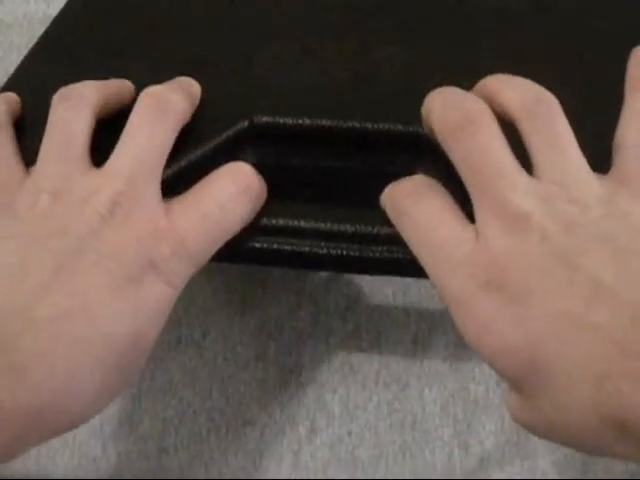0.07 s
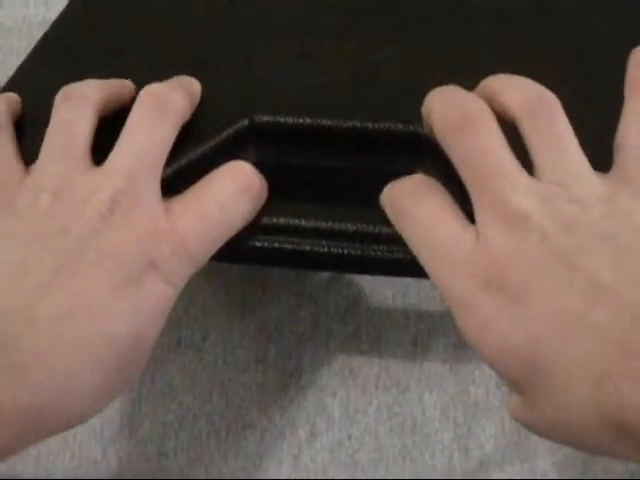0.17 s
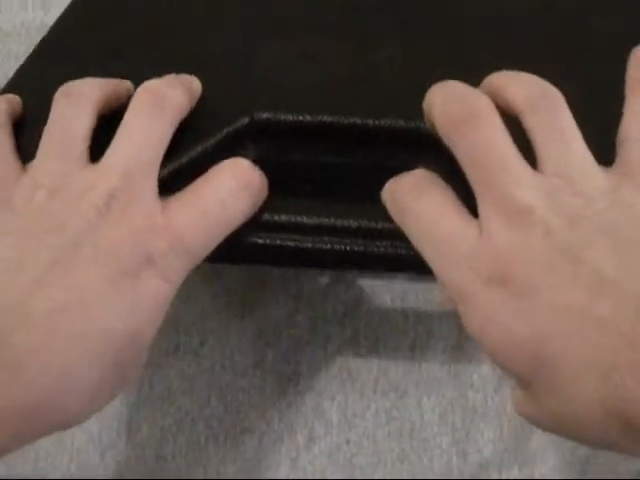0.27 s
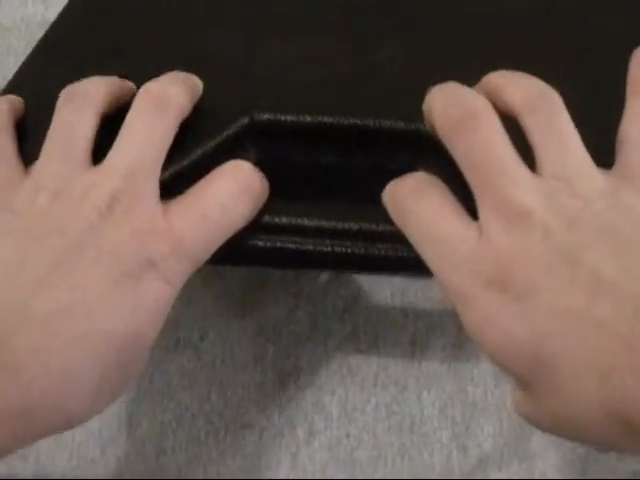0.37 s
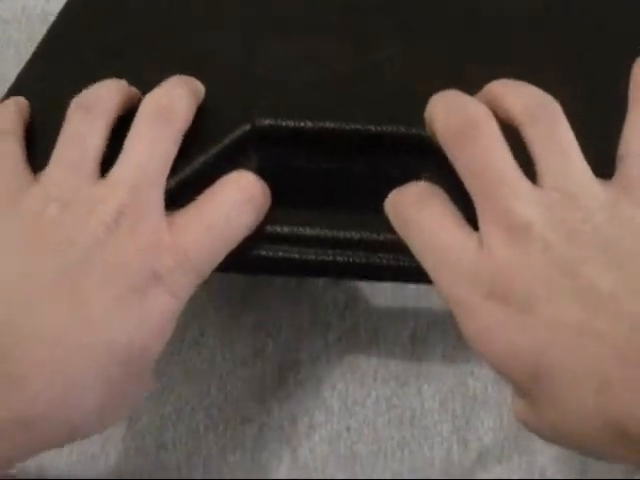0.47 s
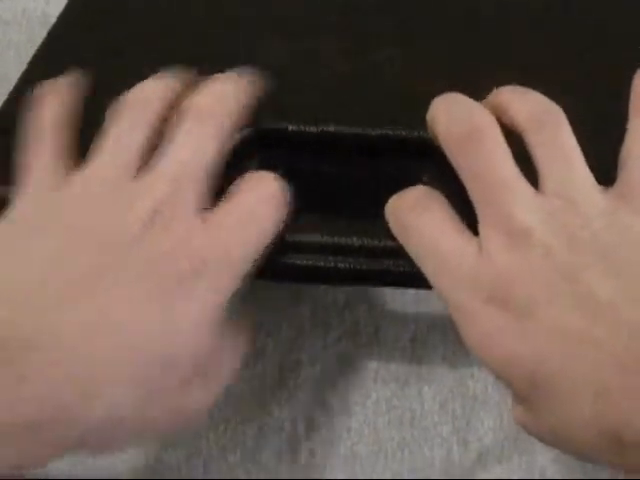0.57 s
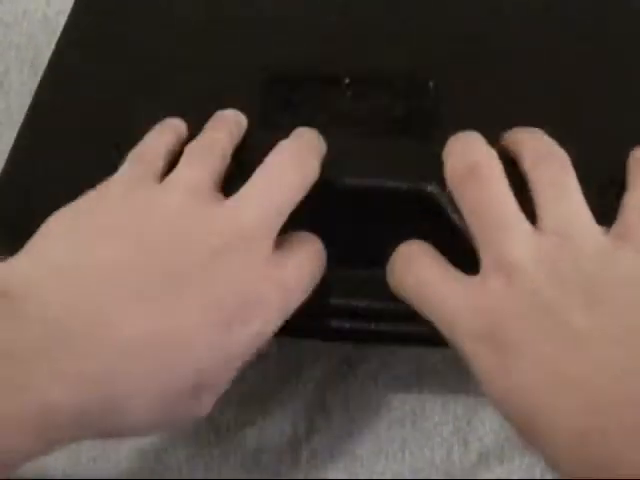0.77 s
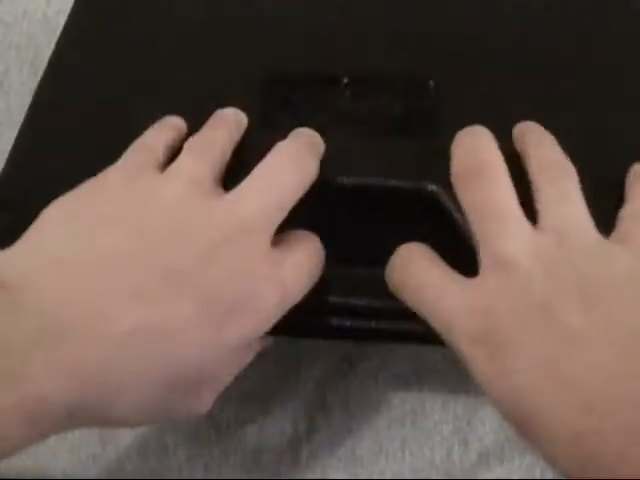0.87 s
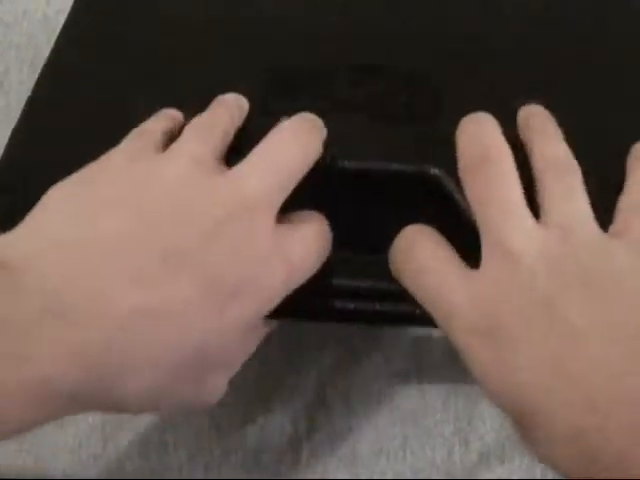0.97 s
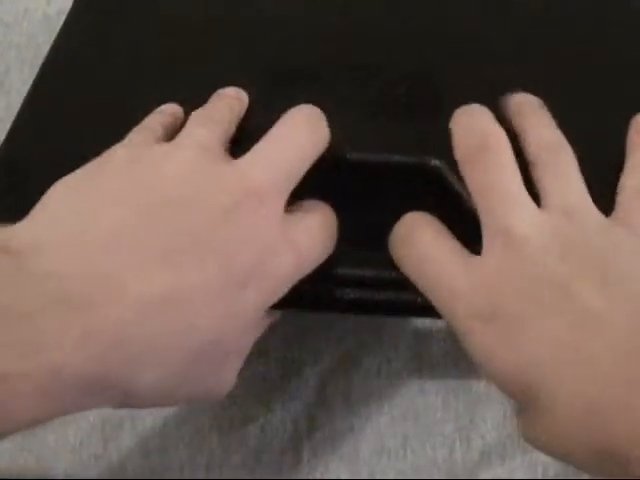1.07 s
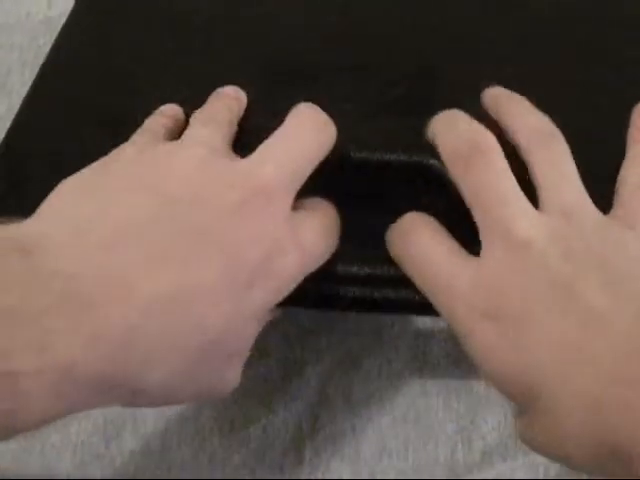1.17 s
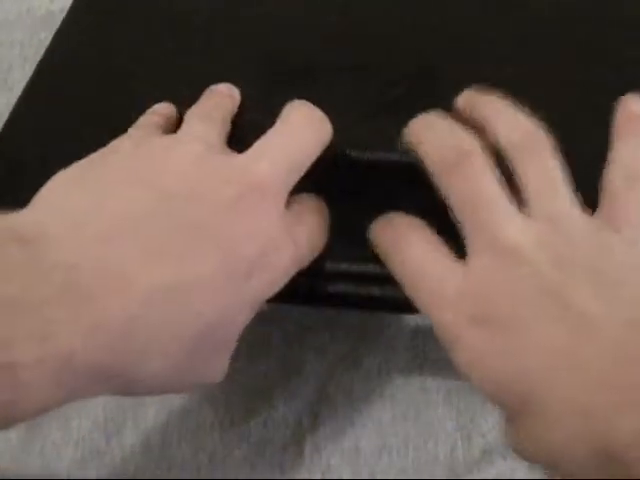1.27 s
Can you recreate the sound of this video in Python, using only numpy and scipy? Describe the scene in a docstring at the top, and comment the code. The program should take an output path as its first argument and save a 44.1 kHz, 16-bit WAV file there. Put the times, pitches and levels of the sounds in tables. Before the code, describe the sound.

Two latches of a hard plastic case snap open, one loud, one softer, then handling clicks

```python
"""In a small room, close to the microphone, two latches of a hard plastic case snap open in turn.
Each snap is a gritty crack with swings of the hollow wall, ringing lever and shell, and a thin high ringing
around 8 kHz. Around them fingers shift on the lid: noisy ticks with short pings, damped low bumps, and
rubbing built from dense random grains. Decaying noise makes the reflections; coloured noise a steady hiss."""
import sys
import numpy as np
from scipy import signal
from scipy.io import wavfile

SR = 44100
rng = np.random.default_rng(int(sys.argv[2]) if len(sys.argv) > 2 else 0)


def digitize_waveform(pressure):
    """Quantize a signal to 16-bit integers and store it at the path in sys.argv[1].

    Rows of a 2-D input are taken as channels; values are limited to [-1, 1].
    """
    field = np.atleast_2d(pressure).T
    bounded = np.clip(field, -1, 1)
    quanta = np.round(bounded * 32767).astype(np.int16)
    wavfile.write(sys.argv[1], SR, quanta)


N = 57330  # length in samples, 1.3 s

# Modes of the hollow plastic shell. Each row: pitch in Hz, level in dB, t60 in seconds.
SHELL_MODES = [(126.4, -28, 0.6), (225.8, -8, 0.37), (249, -31, 0.21), (340, -3, 0.27), (428.3, -17.5, 0.5),
               (479, -19, 0.18), (609.8, -20, 0.44), (717, -28, 0.08), (999, -17.5, 0.29),
               (1466, -26, 0.44), (1778, -33, 0.19)]
# Quickly damped modes of the latch lever. Each row: pitch in Hz, level in dB, t60 in seconds.
LEVER_MODES = [(448, 3.5, 0.0078), (625, -15, 0.012), (1027, -3, 0.011), (1194, -2, 0.012),
               (1460, -7, 0.012), (1715, -8, 0.01), (2330, -40, 0.0079)]


def amp(db):
    """Decibels to gain."""
    return 10 ** (np.asarray(db) / 20)


def evened(x):
    """Scales to unit rms."""
    return x / np.sqrt(np.mean(x ** 2) + 1e-20)


def read(points, hz):
    """Reads a table of (Hz, value) on a log-frequency axis."""
    f, value = np.transpose(points)
    return np.interp(np.log(hz + 1), np.log(f + 1), value)


def add(mix, s, sound):
    """Mixes a sound in at s seconds."""
    part = mix[max(round(s * SR), 0):][:len(sound)]
    part += sound[:len(part)]


def colour(x, points, size=4096):
    """Causal filter of unit energy with the spectrum given in (Hz, dB)."""
    hz = abs(np.fft.fftfreq(size, 1 / SR))
    log_gain = np.log(amp(read(points, hz)))
    # the Hilbert transform gives the minimum phase: energy arrives as early as it can
    spectrum = np.exp(np.conj(signal.hilbert(log_gain)))
    taps = np.fft.ifft(spectrum).real[:size // 2]
    return signal.fftconvolve(x, taps / np.linalg.norm(taps))[:len(x)]


def hiss():
    """Steady room and microphone noise: random samples through a fixed colour."""
    # Each row: frequency in Hz, relative density in dB per Hz.
    hiss_colour = [(20, 12.5), (45, -6.5), (150, -3), (260, 1.5), (500, 2.5), (1100, -5), (2000, -3),
                   (4000, -8.5), (6500, -14.5), (7900, -21.5), (10500, -16.5), (15000, -20.5)]
    level_db = -48  # rms
    return amp(level_db) * evened(colour(rng.standard_normal(N), hiss_colour))


def rubbing():
    """Sliding skin catches on the textured plastic in dense tiny grains of random size and sign."""
    # Strength of the fingers' sliding. Each row: time in seconds, level in dB.
    slides = [(0, -47.5), (0.098, -51.5), (.16, -58), (.22, -49.5), (.4, -41.5), (.5, -46), (0.523, -91),
              (.69, -48.5), (.78, -46.5), (.87, -49), (.915, -43.5), (.945, -45.5), (.98, -39),
              (1.011, -41.5), (1.035, -50.5), (1.12, -50), (1.165, -45.5), (1.21, -51), (1.3, -54.5)]
    # Colour of skin on plastic. Each row: frequency in Hz, relative level in dB.
    rub_colour = [(60, -12), (160, -11.5), (280, 13.5), (600, 2), (1100, 9), (1800, -3), (2500, -2.5),
                  (4000, -13.5), (6300, -8.5), (8000, -11.5), (10000, -14.5), (15000, -19)]
    grains_per_s, spread_db = 3000, 2
    size_db = spread_db * np.minimum(rng.exponential(1, N), 4)
    sizes = amp(size_db) * rng.choice([-1, 1], N)
    grains = sizes * (rng.random(N) < grains_per_s / SR)
    level_db = np.interp(np.arange(N) / SR, *np.transpose(slides))
    return evened(colour(grains, rub_colour)) * amp(level_db)


def contact(points, decay_s):
    """One sharp pulse with a short gritty trail, as hard surfaces meet."""
    grit, grit_hz, rise_s = 0.74, 1330, 0.00043  # trail's share of the energy, its low cut, its rise
    t = np.arange(SR // 20) / SR
    trail = rng.standard_normal(len(t)) * np.exp(-t / decay_s) * np.minimum(t / rise_s, 1)
    trail = signal.sosfilt(signal.butter(2, grit_hz, "high", fs=SR, output="sos"), trail)
    push = np.sqrt(grit) * trail / np.linalg.norm(trail)
    push[0] += np.sqrt(1 - grit)
    return colour(push, points)


def ring(modes):
    """Dying sines, from rows of pitch in Hz, level in dB, t60 in seconds."""
    t = np.arange(SR // 2) / SR
    out = np.zeros(len(t))
    for hz, db, t60 in modes:
        decay = np.exp(-np.log(1000) * t / t60)
        out += amp(db) * decay * np.sin(2 * np.pi * hz * t)
    return out


def flex(hz, swell_s, steep):
    """A heavily damped swing of the plastic wall, strongest swell_s after its start."""
    t = np.arange(SR // 8) / SR
    swell = (t / swell_s * np.exp(1 - t / swell_s)) ** steep
    return swell * np.sin(2 * np.pi * hz * t)


def lever_and_shell(lever_db, shell_db):
    """The lever's short clack and the shell's longer ring start together in opposite polarity."""
    return amp(lever_db) * ring(LEVER_MODES) - amp(shell_db) * ring(SHELL_MODES)


def handling():
    """Loose latches tick, each spot with a short ping of its own, and hands bump the hollow lid."""
    # Small plastic ticks. Each row: start in seconds, tick level in dB, lever clack in dB,
    # shell ring in dB, ping pitch in Hz, ping level in dB.
    ticks = [(0.0720, -25.5, -76, -56, 2460, -50), (0.4197, -16.5, -34, -60, 1500, -46),
             (0.726, -12.5, -30, -38, 2100, -36), (0.7288, -16.5, -35.5, -35, 2000, -23.5),
             (0.7305, -25, -33, -38.5, 1100, -26), (0.7550, -29, -39, -44, 1300, -48),
             (0.7732, -17.5, -37, -52, 1680, -37), (0.7820, -16, -51, -38.5, 1260, -51),
             (0.7915, -20, -43, -54, 3300, -29.5), (0.7981, -9.5, -31, -36, 2420, -27),
             (0.7998, -15.5, -37, -50, 870, -25), (0.8302, -18.5, -39, -37.5, 2300, -45),
             (0.8893, -9, -30, -34, 1510, -23), (0.8978, -12, -29.5, -49, 2020, -24),
             (0.952, -17, -36.5, -45, 1930, -32), (0.97, -18, -35, -52, 3720, -36.5),
             (0.973, -20, -37.5, -42, 1180, -27.5), (0.985, -18, -54, -49, 1060, -51),
             (1.0090, -19.5, -55, -48, 1080, -45), (1.1580, -28, -43, -39.5, 1220, -35)]
    # Soft bumps and rebounds of the lid. Each row: start in seconds, level in dB, pitch in Hz,
    # swell time in seconds.
    bumps = [(0.2890, -27.5, 760, 0.0077), (0.299, -25, 483, 0.0083), (0.3300, -24, 413, 0.0085),
             (0.3420, -24, 244, 0.0079), (0.4271, -22, 267.4, 0.0085), (0.4340, -29, 840, 0.0049),
             (0.4370, -30, 557, 0.0042), (0.7280, -32.5, 342, 0.006), (0.8000, -30, 271, 0.0055),
             (0.8380, -32.5, 280, 0.011), (0.8838, -18, 280, 0.0021), (0.8862, -37, 147, 0.012),
             (0.9720, -34.5, 260, 0.006), (1.0920, -43.5, 345, 0.0094), (1.1050, -32, 269, 0.011),
             (1.141, -36, 378, .005), (1.154, -30, 268, .009)]
    # Colour of a tick. Each row: frequency in Hz, relative level in dB.
    tick_colour = [(40, -52), (150, -48), (600, -3.5), (1500, 7.5), (2200, 9.5), (3100, -1.5), (4200, 1),
                   (6300, -0.5), (7900, -5.5), (9800, -5), (15000, -10)]
    tick_decay_s, ping_t60_s = 0.0023, 0.0096
    out = np.zeros(N)
    for s, tick_db, lever_db, shell_db, ping_hz, ping_db in ticks:
        add(out, s, amp(tick_db) * contact(tick_colour, tick_decay_s))
        add(out, s, lever_and_shell(lever_db, shell_db))
        add(out, s, ring([(ping_hz, ping_db, ping_t60_s)]))
    for s, db, hz, swell_s in bumps:
        add(out, s, amp(db) * flex(hz, swell_s, steep=2.27))
    return out


def latches():
    """Each blow cracks, swings the wall and rings lever and shell; a thin high ringing joins each latch."""
    # Blows of the two latches. Each row: time in seconds, crack level in dB, lever clack in dB,
    # wall swing in dB, swing pitch in Hz, swell time in seconds, shell ring in dB.
    blows = [(0.2341, 6.5, -8.5, -1.5, 294, 0.0024, -17), (0.2366, -3, -25.5, -14.5, 1058, 0.0025, -36),
             (0.2374, -0.5, -27.5, -23, 745, 0.0044, -27), (0.4243, -10.5, -43, -21.5, 561, 0.0035, -50),
             (0.4247, -11, -29, -20.5, 1138, 0.0019, -49), (0.4270, -37, -40, -21.5, 872, 0.0038, -55),
             (0.4278, -15, -28, -29, 700, 0.0028, -41)]
    # Colour of the crack. Each row: frequency in Hz, relative level in dB.
    crack_colour = [(40, -44), (150, -33), (600, 16), (1700, 6), (2800, 3.5), (4500, 0.5), (6000, -1.5),
                    (8000, 4), (11000, -8.5), (15000, -5)]
    # High ring partials. Each row: pitch in Hz, relative level in dB.
    high_ring_modes = [(7006, -9), (7669, 0), (8331, 0), (8850, -8)]
    # A thin high ringing around 8 kHz at each latch, the second much shorter.
    # Each row: start in seconds, level in dB, t60 in seconds.
    high_ring_hits = [(0.2350, -40.5, 0.27), (0.4257, -34.5, 0.054)]
    crack_decay_s, flex_lead_s = 0.0013, 0.001567  # the wall starts to swing before the crack
    out = np.zeros(N)
    for s, crack_db, lever_db, flex_db, flex_hz, swell_s, shell_db in blows:
        add(out, s, amp(crack_db) * contact(crack_colour, crack_decay_s))
        add(out, s - flex_lead_s, amp(flex_db) * flex(flex_hz, swell_s, steep=2.4))
        add(out, s, lever_and_shell(lever_db, shell_db))
    for s, db, t60 in high_ring_hits:
        modes = [(hz, mode_db, t60) for hz, mode_db in high_ring_modes]
        add(out, s, amp(db) * ring(modes))
    return out


def radiate(x):
    """The small shell radiates little bass."""
    bass_hz = 108
    return signal.sosfilt(signal.butter(3, bass_hz, "high", fs=SR, output="sos"), x)


def room(x):
    """A noise tail holds nearly level for a moment, then dies away band by band."""
    # Colour of the tail. Each row: frequency in Hz, relative level in dB.
    room_colour = [(50, -10), (85, 11), (120, -3), (165, -5.5), (235, 1), (330, -4.5), (480, 4.5),
                   (750, 2.5), (1100, -1.5), (1700, 1.5), (4000, -1.5), (8000, 1), (15000, 1)]
    # Decay after the hold. Each row: frequency in Hz, t60 in seconds.
    room_t60 = [(100, 0.14), (300, 0.42), (1000, 0.29), (4000, 0.15), (12000, 0.35)]
    level_db, hold_s, sag_db_per_s, rise_s = -6.5, 0.09, 34, 0.002
    hz, t, bands = signal.stft(rng.standard_normal(SR * 3 // 4), SR, nperseg=256)
    sag_db = sag_db_per_s * np.minimum(t, hold_s)
    fall_db = sag_db + 60 * np.maximum(t - hold_s, 0) / read(room_t60, hz)[:, None]
    tail = signal.istft(bands * amp(-fall_db), SR)[1]
    tail *= np.minimum(np.arange(len(tail)) / SR / rise_s, 1) ** 2
    tail = colour(tail, room_colour)
    return amp(level_db) * signal.fftconvolve(x, tail / np.linalg.norm(tail))[:N]


def scene():
    """Close sounds, reflections and hiss; the reflections are quieter after the second latch."""
    later_from_s, later_send_db = 0.4, -7.5  # starts just ahead of the second latch
    handling_send_db = -8.5  # the small handling sounds reach the room more weakly
    snaps, small = radiate(latches()), radiate(handling())
    later_send = amp(later_send_db * (np.arange(N) / SR > later_from_s))
    reflections = room(later_send * snaps + amp(handling_send_db) * small)
    return (snaps + small + reflections + rubbing() + hiss())[None]


def record(dry):
    """A narrow treble dip near 8 kHz, clipping at full scale, then a steep treble limit."""
    dip_hz, dip_width_hz, edge_hz = 8030, 580, 15650
    dipped = signal.lfilter(*signal.iirnotch(dip_hz, dip_hz / dip_width_hz, SR), dry)
    clipped = np.clip(dipped, -1, 1)
    band_limit = signal.firwin(511, edge_hz, window=("kaiser", 8), fs=SR)
    return signal.oaconvolve(clipped, band_limit[None], "same")


dry = scene()
out = record(dry)
digitize_waveform(out)
```